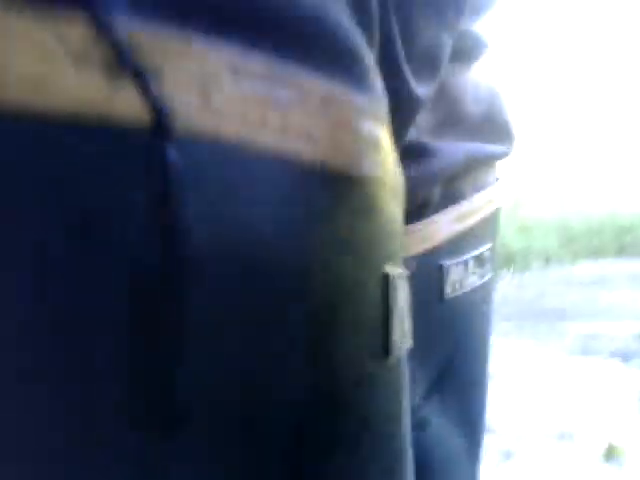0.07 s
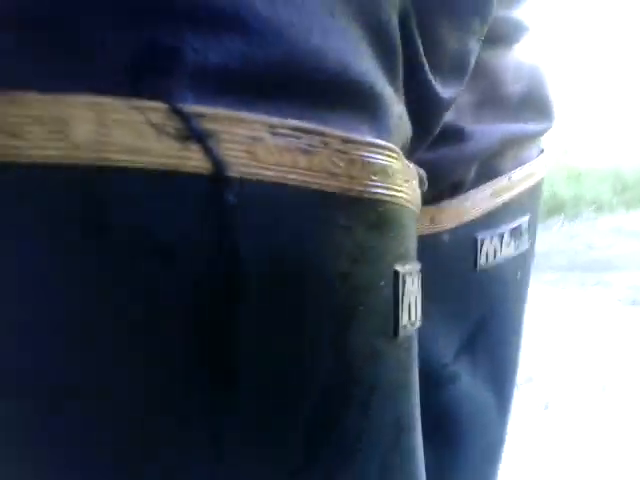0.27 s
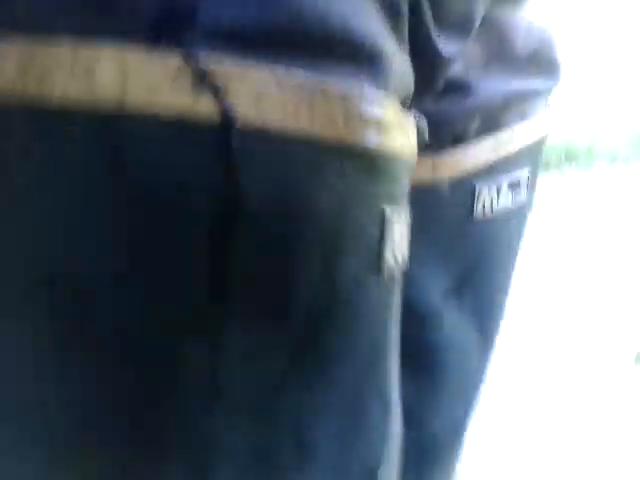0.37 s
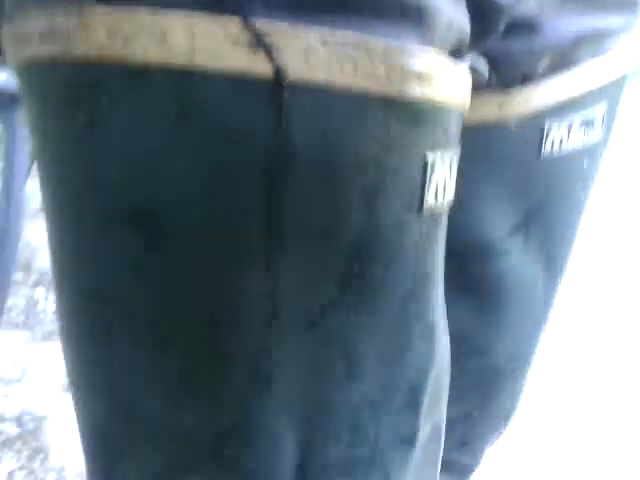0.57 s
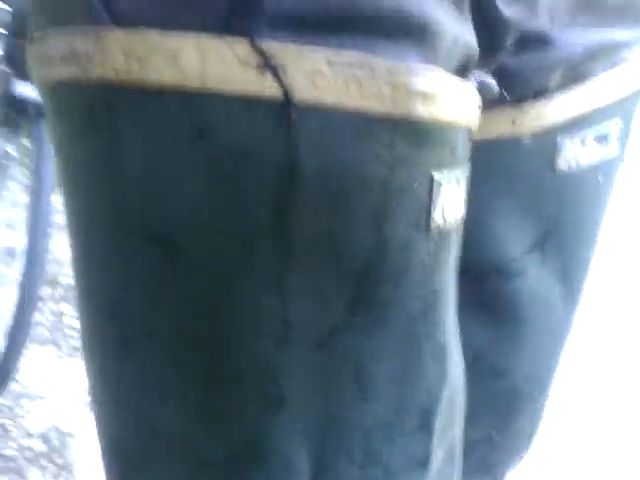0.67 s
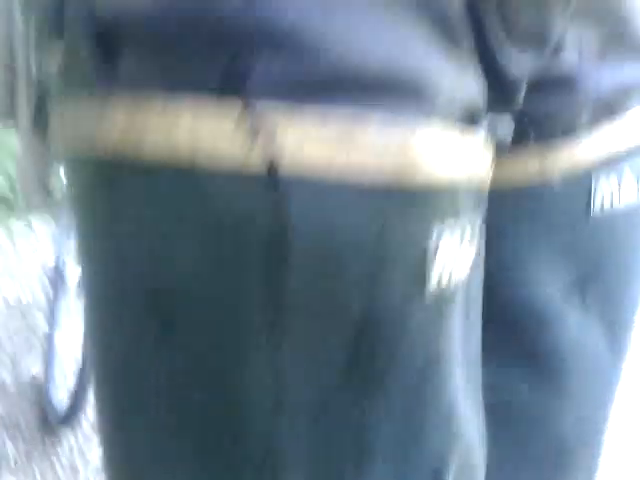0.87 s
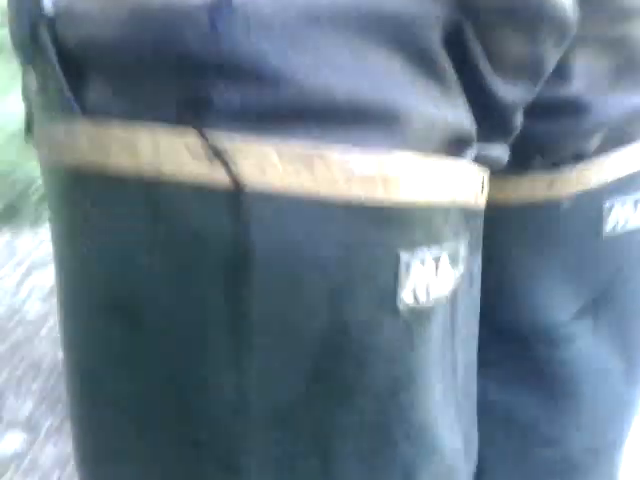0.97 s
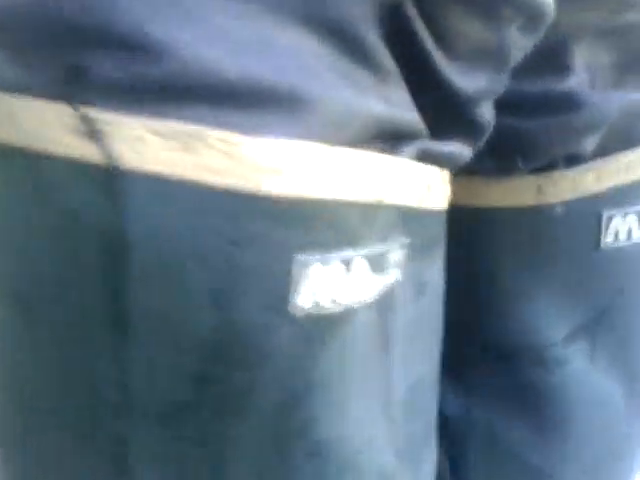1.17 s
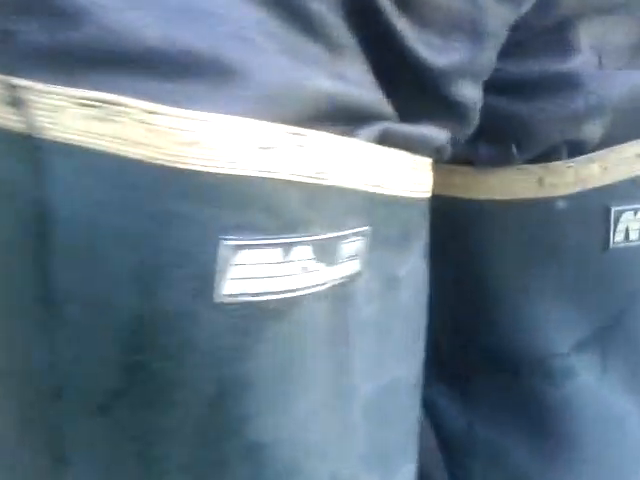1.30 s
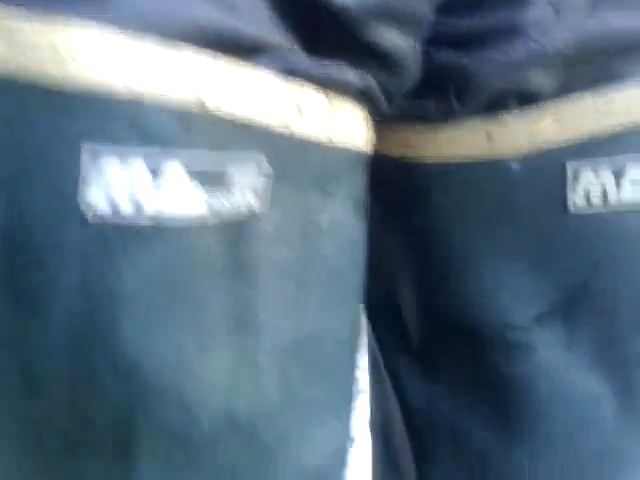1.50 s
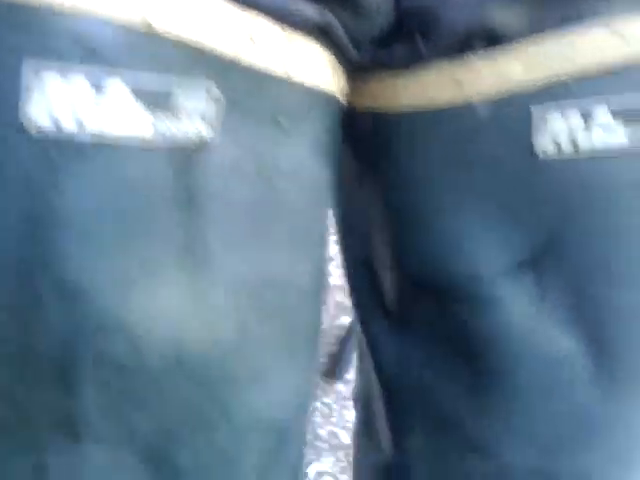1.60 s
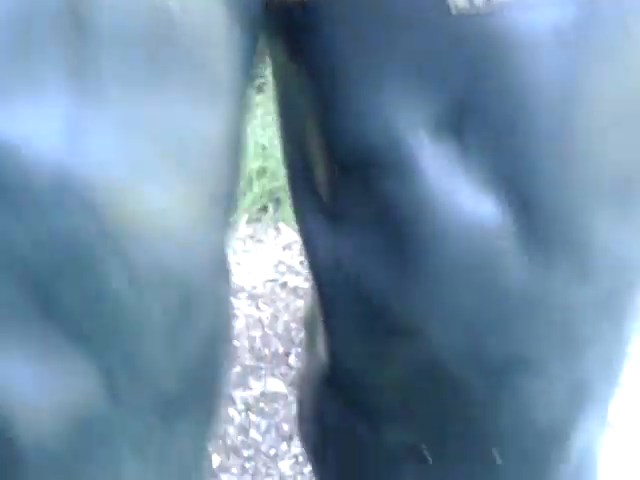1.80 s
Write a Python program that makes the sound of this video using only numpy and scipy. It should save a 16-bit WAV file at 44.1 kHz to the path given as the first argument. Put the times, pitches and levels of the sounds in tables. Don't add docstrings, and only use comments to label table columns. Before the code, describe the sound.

A hard double knock rings a small camera's case and overloads its narrow microphone, after a lighter bump; rubber boots scuff with small ticks and soft thuds, then fade to faint rubbing in an outdoor breeze.

```python
import sys
import numpy as np
from scipy import signal
from scipy.fft import rfft, irfft, next_fast_len
from scipy.io import wavfile
from scipy.ndimage import uniform_filter1d

SR = 44100
rng = np.random.default_rng(int(sys.argv[2]) if len(sys.argv) > 2 else 0)


def log_audio(samples):
    frames = np.atleast_2d(samples).T
    limited = np.clip(frames, -1, 1)
    pcm = np.round(limited * 32767).astype(np.int16)
    wavfile.write(sys.argv[1], SR, pcm)


def convert_level_to_amplitude(level_db):
    exponent = np.asarray(level_db, float) / 20
    return 10 ** exponent


N = 81585
TIME_S = np.arange(N) / SR


def unit(x):
    return x / np.sqrt(np.mean(x ** 2))


def resonance(x, hz, width_hz):
    b, a = signal.iirpeak(hz, hz / width_hz, fs=SR)
    return signal.lfilter(b, a, signal.lfilter(b, a, x))


def walk(rate_hz):
    hold = int(SR / rate_hz)
    steps = np.repeat(rng.standard_normal(N // hold + 1), hold)
    smooth = uniform_filter1d(uniform_filter1d(steps, hold), hold)
    return unit(smooth[:N])


def ring(start_s, hz, t60_s):
    rise_cycles = 0.47
    t = np.maximum(TIME_S - start_s, 0)
    decay = np.exp(-np.log(1000) * t / t60_s)
    onset = 1 - np.exp(-t * hz / rise_cycles)
    return np.sin(2 * np.pi * hz * t) * decay * onset


def rubbing():
    grains_per_s, grain_spread_db, patchy_db = 2500, 3.5, 1.8
    # (time [s], level [dB], brightness [dB])
    effort = [(0, -107, -1.5), (.2, -44, 0), (.26, -43, -7.5), (.36, -39, -6), (.43, -34, -3),
              (.52, -39, -5), (0.681, -44.5, 0), (.72, -38.5, 4), (0.779, -37.5, -2), (0.838, -35, -4.5),
              (.93, -44.5, -1), (1.061, -41.5, -2.5), (1.121, -43, 2), (1.16, -43.5, 9.5), (1.2, -57, 13),
              (1.22, -55, -4), (1.8, -49.5, -3), (1.83, -48.5, -2)]
    # (frequency [Hz], width [Hz], level [dB])
    low_modes = [(131, 140, -24.5), (324, 230, -9.5), (444.4, 212, -4.5), (900, 240, -5)]
    high_modes = [(2280, 800, -9), (3176, 990, -5.5), (4120, 450, -10.5)]
    effort_s, effort_db, bright_db = np.transpose(effort)
    brightness_db = np.interp(TIME_S, effort_s, bright_db)
    out = np.zeros(N)
    for modes, tilt in ((low_modes, 0), (high_modes, 1)):
        size_db = grain_spread_db * np.minimum(rng.exponential(size=N), 3)
        slips = (rng.random(N) < grains_per_s / SR) * rng.standard_normal(N) * convert_level_to_amplitude(size_db)
        slips = unit(slips) * convert_level_to_amplitude(patchy_db * walk(60) + tilt * brightness_db)
        for hz, width_hz, db in modes:
            even_power = np.sqrt(SR / width_hz / 4)
            out += convert_level_to_amplitude(db) * even_power * resonance(slips, hz, width_hz)
    return out * convert_level_to_amplitude(np.interp(TIME_S, effort_s, effort_db))


def knocks():
    lag_cycles = 2.15
    # (frequency [Hz], peak [dB], t60 [s]))
    blows_on_case = [
        (0.1968, [(373.3, -19.5, 0.069), (506, -9, 0.019), (748, -12.5, 0.026), (1116, -14, 0.011)]),
        (0.3777, [(234, -6.5, 0.045), (361, -3, 0.0437), (432, -15, 0.086), (658.6, 0.5, 0.027), (796.4, -8, 0.022), (989.5, 2, 0.016), (1315, -5.5, 0.0082), (1676, -4.5, 0.016)]),
    ]
    out = np.zeros(N)
    for start_s, modes in blows_on_case:
        for hz, db, t60_s in modes:
            out += convert_level_to_amplitude(db) * ring(start_s + lag_cycles / hz, hz, t60_s)
    return out


def thuds():
    # (time [s], peak [dB], pitch factor [ratio], push [s])
    pushes = [(.028, -34, 1, 0.011), (.1865, -31, 1.62, 0.0042), (0.1954, -15.5, 1.59, 0.0026),
              (.2070, -17.5, 1.2, 0.00544), (0.273, -32.5, 1.24, 0.0037), (0.283, -32, 1.1, .004),
              (0.367, -6, 1.01, 0.00626), (.436, -25.5, 0.61, .01), (.498, -32.5, 1.24, 0.0084),
              (.700, -36.5, 1.15, 0.0035), (0.848, -33, .7, .006), (1.059, -33, 1.3, 0.007),
              (1.678, -33.5, 1.12, 0.0062), (1.8276, -26.5, .97, .011)]
    # (frequency [Hz], level [dB], t60 [s])
    case_modes = [(246.8, -18.5, 0.066), (358.3, 7, 0.028), (592.6, -4.5, 0.044)]
    out = np.zeros(N)
    for start_s, db, factor, push_s in pushes:
        middle_s = push_s * (0.4 + 0.12 * rng.random())
        for delay_s, gain in ((0, 1), (middle_s, -0.7), (push_s, 0.8)):
            for hz, mode_db, t60_s in case_modes:
                out += convert_level_to_amplitude(db) * gain * convert_level_to_amplitude(mode_db) * ring(start_s + delay_s, hz * factor, t60_s) / 2
    return out


def ticks():
    overtone_ratio, overtone_db = 1.33, -0.5
    # (time [s], peak [dB], frequency [Hz], t60 [s])
    contacts = [(0.1867, -30, 2840, 0.0043), (0.1969, -21.5, 1162, 0.015), (0.1991, -22, 1300, 0.0082),
                (.3770, -11, 45, 0.06), (0.367, -0.5, 3260, 0.0066), (.3673, -4.5, 3960, .005),
                (.3688, -7, 1160, 0.0083), (0.3738, -18, 900, 0.011), (.3776, -7.5, 970, 0.016),
                (.3790, -1, 2992, 0.0063), (0.379, -7.5, 4060, 0.0029), (.3812, 0.5, 3140, 0.0054),
                (0.7146, -37.5, 2270, 0.014), (.8265, -20.5, 2030, 0.0065), (0.8264, -18, 950, 0.013),
                (.8340, -38, 3100, 0.035), (.8380, -26, 2310, 0.014), (.8385, -27.5, 694, 0.031),
                (1.0201, -34, 2380, 0.014), (1.0590, -35, 2300, .012), (1.0990, -40.5, 2470, 0.013),
                (1.1410, -34.5, 1965, .02), (1.1533, -33, 2344, 0.033), (1.1670, -37.5, 2600, .015),
                (1.174, -36, 2400, 0.024), (1.208, -40.5, 3020, 0.023), (1.827, -38, 1690, .012)]
    grit = 1 + 0.3 * unit(resonance(rng.standard_normal(N), 500, 600))
    out = np.zeros(N)
    for start_s, db, hz, t60_s in contacts:
        upper = grit * convert_level_to_amplitude(overtone_db) * ring(start_s, hz * overtone_ratio, t60_s)
        out += convert_level_to_amplitude(db) * (ring(start_s, hz, t60_s) + upper)
    return out


def breeze():
    swell_db, flicker_db = 0.5, 1.0
    # (frequency [Hz], density [dB per Hz])
    breeze_colour = [(40, -7.5), (150, -27), (280, -7.5), (420, -4), (1050, -3.5), (1600, -14.5),
                     (2500, -17.5), (3400, -18)]
    # (time [s], level [dB])
    breeze_level = [(0, -49), (0.301, -46.5), (1.2, -45.5), (1.85, -46.5)]
    colour_hz, colour_db = np.transpose(breeze_colour)
    swell = walk(2.2)
    out = np.zeros(N)
    for hz in 40 * 2 ** (np.arange(21) / 3):
        density_db = np.interp(np.log(hz), np.log(colour_hz), colour_db)
        band_db = density_db + 10 * np.log10(hz)
        noise = unit(resonance(rng.standard_normal(N), hz, hz / 3))
        out += noise * convert_level_to_amplitude(band_db + swell_db * swell + flicker_db * walk(28))
    return unit(out) * convert_level_to_amplitude(np.interp(TIME_S, *np.transpose(breeze_level)))


def scene():
    return (rubbing() + knocks() + thuds() + ticks() + breeze())[None]


def top_cut(x):
    return signal.sosfilt(signal.butter(12, 16760, fs=SR, output="sos"), x)


def record(dry):
    clip_level, top_hz = 0.72, 16000
    # (frequency [Hz], gain [dB])
    mic_response = [(20, -26.5), (120, -2.5), (250, 1), (3750, 1), (4000, -16), (4500, -26), (4750, -75.5),
                    (22000, -120)]
    mic_hz, mic_db = np.transpose(mic_response)
    size = next_fast_len(N + 8192)
    hz = np.arange(size // 2 + 1) * SR / size + 1
    gain = convert_level_to_amplitude(np.interp(np.log(hz), np.log(mic_hz), mic_db))
    heard = irfft(rfft(dry, size) * gain, size)[:, :N]
    clipped = np.clip(heard, -clip_level, clip_level)
    low_pass = signal.ellip(8, 0.2, 70, top_hz, fs=SR, output="sos")
    return top_cut(signal.sosfilt(low_pass, clipped))


dry = scene()
out = record(dry)
log_audio(out)
```